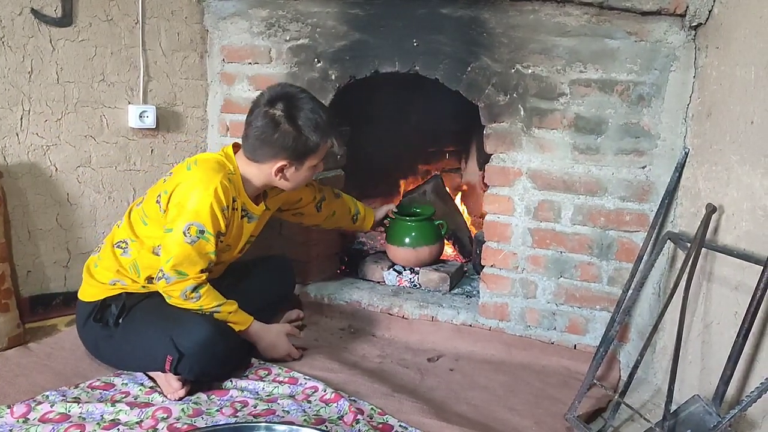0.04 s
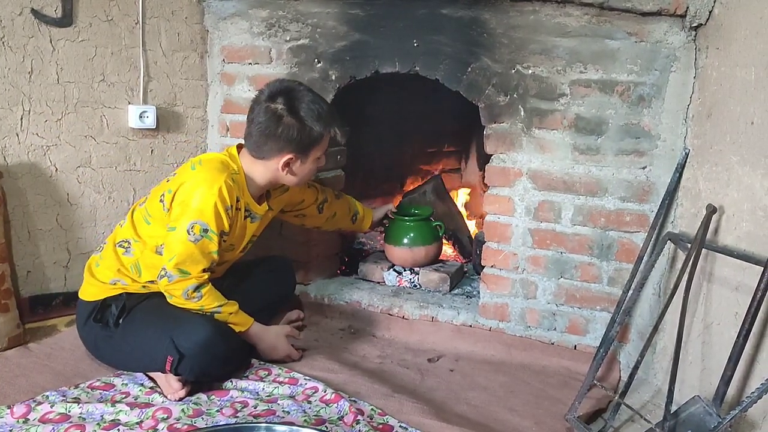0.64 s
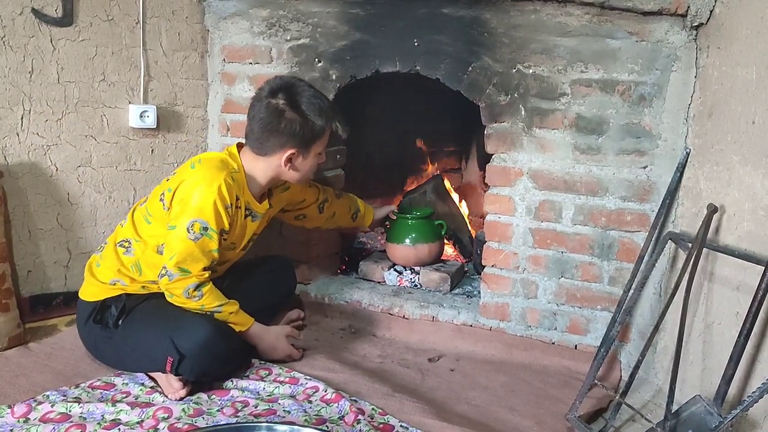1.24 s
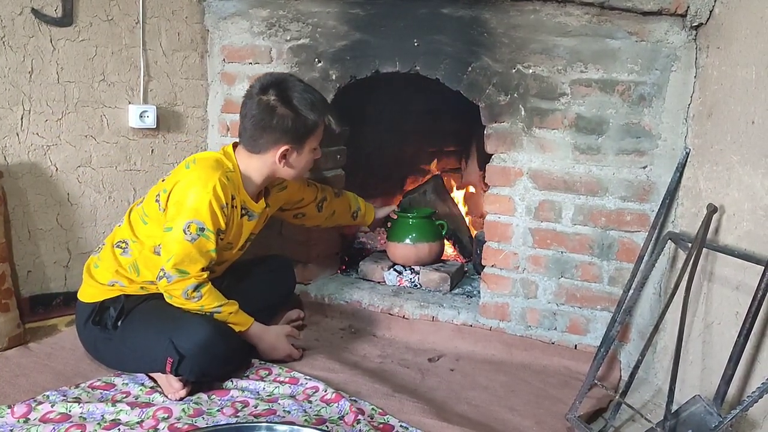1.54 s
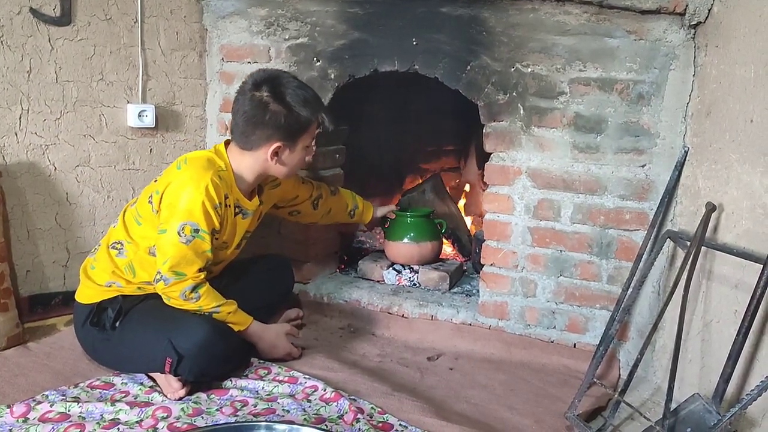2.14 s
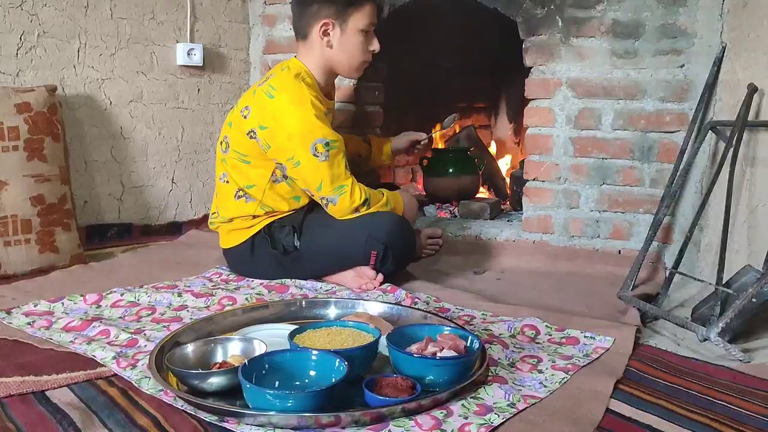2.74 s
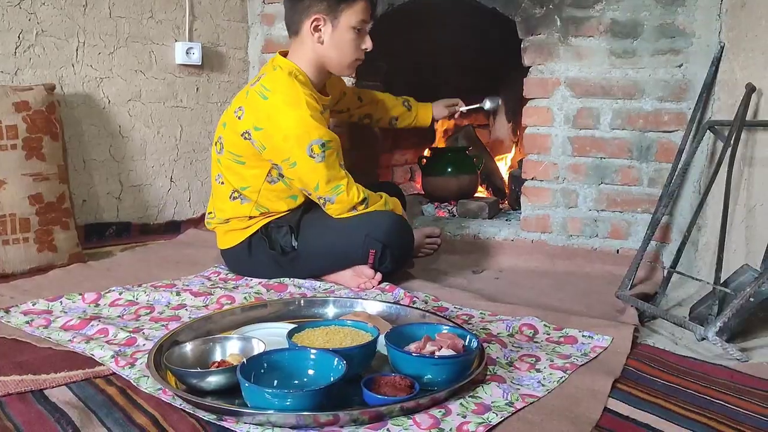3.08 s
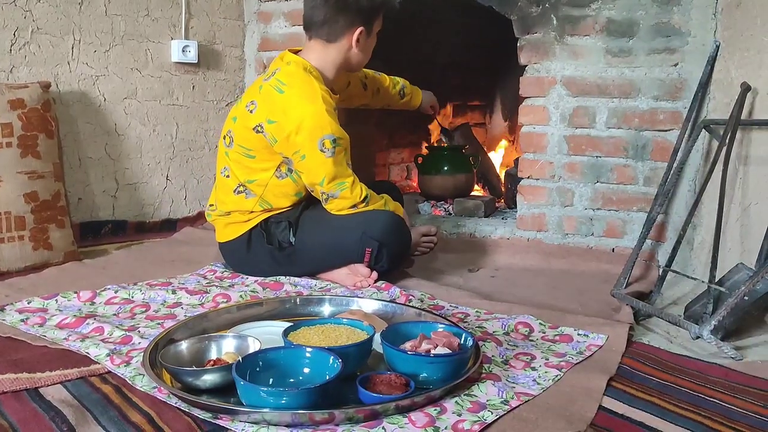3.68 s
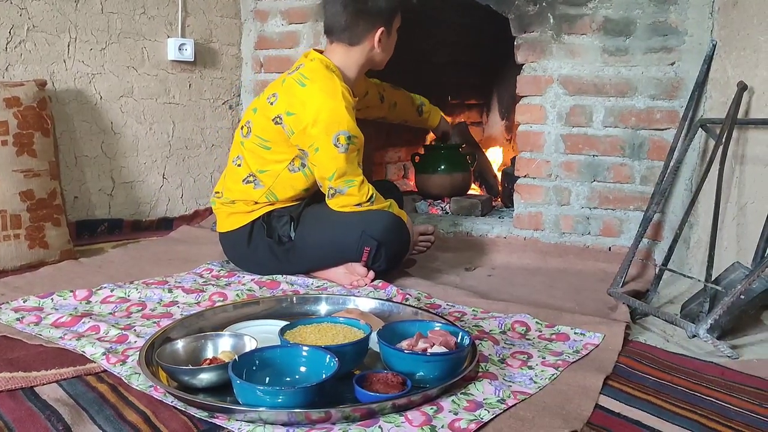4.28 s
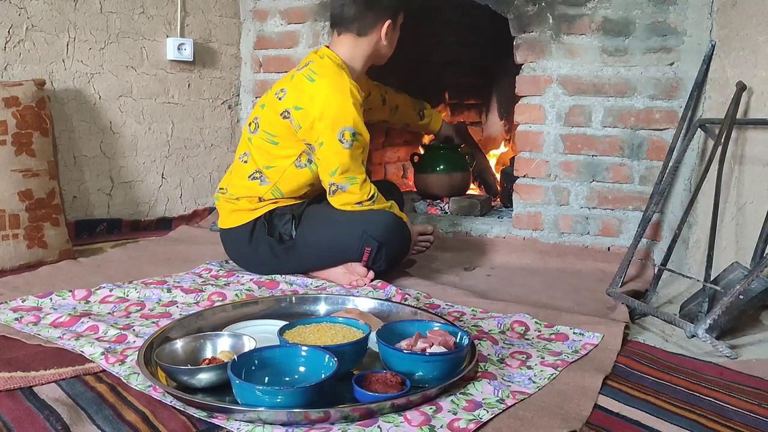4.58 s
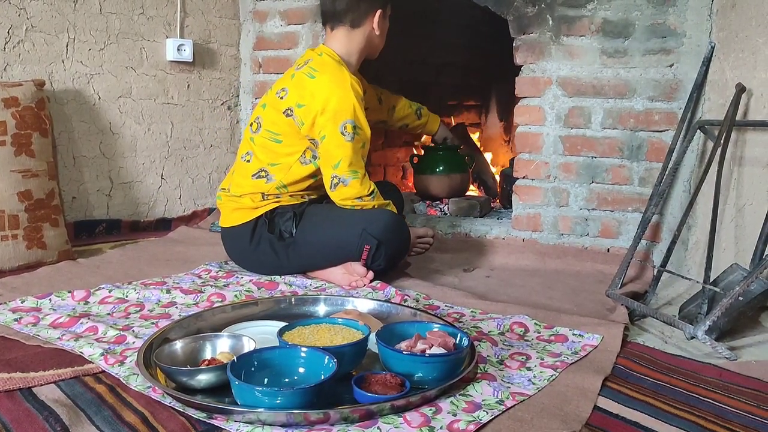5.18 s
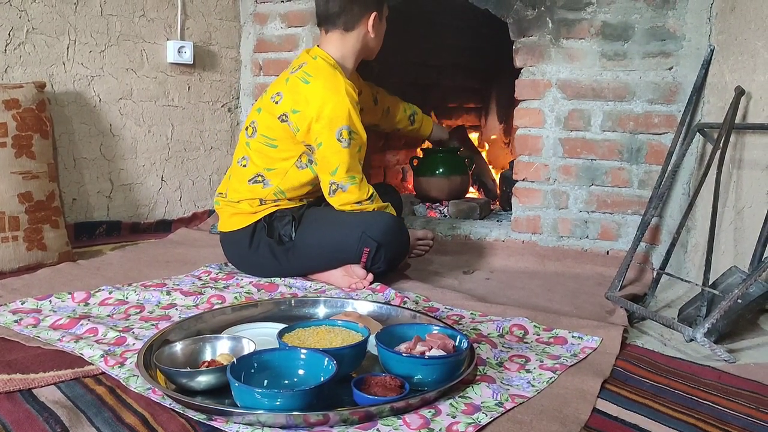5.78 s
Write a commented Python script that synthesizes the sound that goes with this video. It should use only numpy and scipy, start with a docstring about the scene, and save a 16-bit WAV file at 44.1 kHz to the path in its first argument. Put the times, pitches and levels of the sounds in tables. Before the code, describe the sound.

A clay pot softly scrapes and bumps on bricks by a ticking wood fire, with loud electrical pops midway and later spoon clinks.

```python
"""In a small, quiet room, a glazed clay pot stands on bricks at a wood fire. A hand shifts the pot: it scrapes
lightly, and each bump makes the air inside ring hollow. Embers tick and pockets of gas snap in the logs, while
faint chirps and whistles come from far off. Midway, the right channel pops: its level jumps, sticks, crackles
and drains away. Later a steel spoon clinks and knocks on the pot, and both clay and steel ring."""
import sys
import numpy as np
from scipy import signal
from scipy.fft import rfft, irfft
from scipy.io import wavfile

SR = 44100
rng = np.random.default_rng(int(sys.argv[2]) if len(sys.argv) > 2 else 0)


def persist_wave(psi):
    """Save psi, clipped to +-1, as 16-bit WAV."""
    counts = np.round(np.clip(psi, -1, 1) * 32767).astype(np.int16)
    wavfile.write(sys.argv[1], SR, np.atleast_2d(counts).T)


N = 265482

# The room's echo. Each row: pitch in Hz, t60 (the seconds it takes to fade by 60 dB).
ECHO_T60 = [(200, 0.092), (1300, 0.33), (4000, 0.22), (7000, 0.2), (14000, 0.094)]
# How the left side hears a hearth that lies to the right. Each row: pitch in Hz, gain in dB.
LEFT_SHADE = [(300, -1), (1400, 0.5), (3200, -7), (4500, -3.5), (7000, -14), (14000, -3)]
# The air before and after the pops, and a thin hiss on top. Each row: pitch in Hz, relative level in dB.
EARLY_AIR = [(12, -39), (20, 10.5), (43, -3.5), (64, -7), (127, -12.5), (232, -20.5), (267, -25.5),
             (371, -19.5), (517, -34), (561, -29.5), (1150, -28.5), (1390, -32), (2550, -32), (4950, -40.5),
             (14500, -55.5)]
LATE_AIR = [(12, -59), (20, 7.5), (48, -5), (65, -13), (86, -12.5), (172, -15.5), (252, -27), (403, -32),
            (681, -33), (739, -31), (872, -38), (1510, -35), (1840, -36.5), (4310, -39.5), (14500, -60.5)]
AIR_HISS = [(4000, 0), (7300, 1.5), (8800, -2), (10500, 3), (13500, 10.5)]
# How alike the air sounds left and right. Each row: pitch in Hz, likeness from 0 to 1.
AIR_LIKENESS = [(60, 0.64), (180, 0.86), (550, 0.36), (1650, 0.03), (4970, 0.033), (15000, 0.01)]
# Far-off whistles. Each row: start in seconds, length in seconds, first pitch in Hz, level in dB.
WHISTLES = [(0.228, .46, 1053, -68), (2.383, 0.35, 1135, -68.5)]
# Snapping logs. Each row: start in seconds, level in dB, pitch in Hz, relative level of the crack in dB.
SNAPS = [(.487, -58.5, 7000, 2.5), (.7487, -45, 6870, -8), (1.9215, -55, 7440, 5.5), (2.314, -58, 870, -8),
         (2.539, -55, 2650, 5.5)]
# The tone of cracking wood and of rough clay. Each row: pitch in Hz, relative level in dB.
WOOD_COLOUR = [(500, 3.5), (2500, -1.5), (7000, 0.5), (8800, -10), (10500, 1), (13500, -0.5), (16000, -21)]
SCRAPE_COLOUR = [(300, 6), (800, 8.5), (1400, -17), (2000, -1), (2600, 11), (4500, 6.5), (6800, 13),
                 (8800, -1.5), (14000, -4.5)]
# Scrapes of the pot. Each row: start in seconds, length in seconds, level in dB,
# relative level of the fine grit in dB, pitch in Hz around which the clay rings.
SCRAPES = [(0.112, 0.58, -69.5, 3, 2570), (1.131, 0.086, -72, -12, 6600), (1.721, 0.25, -69, -11, 2480),
           (5.901, 0.28, -60.5, -14, 4270)]
# Bumps of the pot. Each row: start in seconds, level in dB, relative levels of grit and thud in dB.
BUMPS = [(0.2902, -44.5, -35, -29), (.385, -51, -16, 0), (1.1115, -43, -35, -41), (1.8114, -54, -14, -10),
         (1.865, -53.5, -21, 9.5), (1.9777, -35.5, -21.5, -16)]
# The tones of the air in the pot, the clay wall and the steel spoon.
# Each row: pitch in Hz, relative level in dB, t60 in seconds.
HOLLOW_TONES = [(320, 3, 0.26), (342, -6, 0.2), (379.4, -14, 0.35), (602, -33, 0.54), (742, -6.5, 0.04),
                (1018, -24, 0.17)]
CLAY_TONES = [(780, -14, .09), (1225, -11, .08), (1330, -1, .1), (1385, -12, .08), (2030, -3, .1),
              (2110, -4, .12), (2243, -7, .17), (2470, -11, .12), (3122, 1, .13), (3272, 2, .15),
              (3385, -5, .11), (3543, 0, .14), (4090, -10, .08), (4242, -1, .1), (4470, -5, .13),
              (4660, -3, .12), (6185, -8, .1), (7205, -3, .11), (5220, -15, .08), (5900, -14, .09),
              (9500, -27, .08), (10700, -25, .08), (13950, -26, .07)]
SPOON_TONES = [(1481, -6, .54), (1675, -19, .42), (2590, -13, .11), (3537, -11, .2), (4288, -1, .1),
               (4525, -6, .1), (4870, -5, .09), (5642, -12, .11), (6540, 1, .1), (6575, -3, .1),
               (6918, -9, .12), (7938, -15, .1), (10650, -14, .06), (12180, -18, .08), (13040, -15, .07),
               (13950, -14, .06)]
# Spoon blows. Each row: start in seconds, level in dB, height from belly (0) to rim (1),
# relative level of the spoon's ring in dB, seconds until it bounces.
CLINKS = [(4.187, -49.5, 1, 11.5, .0035), (4.9951, -39, 0.85, -23.5, 0.0092),
          (5.2426, -42, 0.38, -28, 0.0023), (5.3406, -50, .02, -22, 0.00286)]
# The crack of steel on clay, and the tones a blow wakes at the belly and at the rim.
# Each row: pitch in Hz, relative level in dB.
CONTACT_COLOUR = [(250, -18), (550, -20), (800, -11), (1000, -9), (1320, 2), (1700, -9), (2100, -2),
                  (2750, -13), (3300, 0), (3850, -6), (4400, -2), (5400, -10), (7200, -7), (8400, -22),
                  (14000, -22)]
BELLY_BLOW = [(750, 13.5), (1330, 12), (2100, 5), (3200, -4.5), (3600, 3), (4400, -1.5), (5200, 0),
              (7000, -7), (8600, -6)]
RIM_BLOW = [(750, -9), (1400, -24), (2100, -4), (3200, -2), (3600, -2.5), (4400, 3), (5100, -4), (6800, 6),
            (8600, 0.5)]
# Pops in the right channel. Each row: start in seconds, level jump (1 is full scale), rise time in seconds.
POPS = [(2.6102, .075, .0007), (2.611, -.19, .0012), (2.61202, .115, .00005), (2.618, .075, .0006),
        (2.6185, -.64, .0032)]
# Crackles after them. Each row: start in seconds, level jump (1 is full scale), drain time in seconds.
CRACKLES = [(2.63288, .1, .012), (2.69148, .075, .015)]

POPS_BAND_HZ, FINAL_BAND_HZ, MIC_BAND_HZ = 14500, 16500, 14500  # treble above these is cut


def amp(db):
    """Turns decibels into a gain to multiply by."""
    return 10 ** (np.asarray(db) / 20)


def unit(x):
    """Scales a signal to an average strength (rms) of 1."""
    return x / np.sqrt(np.mean(x ** 2) + 1e-20)


def read(points, hz):
    """Looks up a pitch in a table, blending between rows on a log scale."""
    f, value = np.transpose(points)
    return np.interp(np.log(hz + 1), np.log(f + 1), value)


def add(mix, s, sound):
    """Mixes in a stereo sound, starting at s seconds."""
    start = round(s * SR)
    sound = sound[:, max(-start, 0):]
    part = mix[:, max(start, 0):][:, :sound.shape[1]]
    part += sound[:, :part.shape[1]]


def noise(size, gain, same=0):
    """Stereo noise shaped by gain(Hz); same=1 makes left and right alike."""
    left, other = rfft(rng.standard_normal((2, size)))
    same = np.clip(same, -1, 1)
    right = same * left + np.sqrt(1 - same ** 2) * other
    return unit(irfft(np.array([left, right]) * gain(np.fft.rfftfreq(size, 1 / SR)), size))


def peak(f, hz, width):
    """A hill-shaped gain that favours pitches near hz."""
    return 1 / (1 + (2 * (f - hz) / width) ** 2)


def low_pass(x, hz):
    """Cuts the treble above hz steeply."""
    return signal.oaconvolve(x, signal.firwin(401, hz, window=("kaiser", 8), fs=SR)[None], "same")


def ring(tones, t, weight_db=lambda hz: 0, apart_hz=3500, blur=1.0, blur_hz=70):
    """Fading tones; high ones scatter among the bricks, so they waver and reach the ears out of step."""
    hz, db, t60 = np.transpose(tones)[:, :, None]
    scatter = np.minimum((hz / apart_hz) ** 1.25, 1)
    phase = rng.uniform(-1.48, 1, (2, len(tones), 1)) * scatter * np.pi / 2
    waver = np.stack([noise(len(t), lambda f: peak(f, 0, 2 * blur_hz)) for _ in tones], 1)
    angle = 2 * np.pi * hz * t + phase
    scattered = waver * np.cos(angle) + waver[::-1] * np.sin(angle)
    tone = np.sin(angle) + blur * np.sqrt(scatter) * scattered
    fade = amp(db + weight_db(hz) - 60 * t / t60)
    return (fade * tone / np.sqrt(1 + 2 * blur ** 2 * scatter)).sum(1)


def air(early_db=-55, late_db=-54, change_s=2.612, flutter_db=2.26, flutter_hz=300):
    """Flames and draught flutter low under a smooth hiss; the tone changes at the pops."""
    hz = np.fft.rfftfreq(N, 1 / SR)
    likeness = read(AIR_LIKENESS, hz)
    early = amp(early_db) * noise(N, lambda f: amp(read(EARLY_AIR, f) + read(AIR_HISS, f)), likeness)
    late = amp(late_db) * noise(N, lambda f: amp(read(LATE_AIR, f) + read(AIR_HISS, f)), likeness)
    steady = np.where(np.arange(N) / SR < change_s, early, late)
    bass = irfft(rfft(steady) * peak(hz, 0, 2 * flutter_hz), N)
    flutter = amp(flutter_db * noise(N, lambda f: peak(f, 0, 31))[0])
    return steady + bass * (flutter - 1)


def room_echo(x, onset_s=0.0094, echoes_per_s=4000):
    """Sound bounces around the brick niche and the room; the middle tones linger longest."""
    echoes = rng.choice([-1., 1.], (2, SR // 2)) * (rng.random((2, SR // 2)) < echoes_per_s / SR)
    hz, t, spectrum = signal.stft(echoes, SR, nperseg=256)
    fade = amp(-60 * t / read(ECHO_T60, hz)[:, None])
    tail = signal.istft(spectrum * fade, SR, nperseg=256)[1]
    tail *= 1 - np.exp(-np.arange(tail.shape[1]) / SR / onset_s)
    return signal.fftconvolve(x, tail / np.linalg.norm(tail[0]), axes=1)[:, :N]


def whistles(width_hz=130, fall=.085, chirp_every_s=1.012, chirp_s=0.117, chirp_hz=1527, chirp_db=-67):
    """Three far-off chirps and two longer whistles: narrow bands of noise that swell and sink in pitch."""
    out, t = np.zeros((2, N)), np.arange(SR * 2 // 3) / SR
    chirps = [(.03 + k * chirp_every_s, chirp_s, chirp_hz, chirp_db) for k in range(3)]
    for s, length, first_hz, db in chirps + WHISTLES:
        progress = np.minimum(t / length, 1)
        angle = 2 * np.pi * np.cumsum(first_hz * (1 - fall * progress)) / SR
        band = sum(noise(len(t), lambda f: peak(f, 0, width_hz), same=0.11) * wave
                   for wave in (np.cos(angle), np.sin(angle)))
        add(out, s, amp(db) * np.sin(np.pi * progress) * unit(band))
    return out


def embers(per_s=14, db=-76, spread_db=3, t60=0.041):
    """The glowing wood gives tiny ticks at random moments."""
    t = np.arange(SR // 100) / SR
    moments = rng.random(N) < per_s / SR
    ticks = moments * amp(db + spread_db * np.minimum(rng.exponential(1, N), 3))
    tick = noise(len(t), lambda f: amp(read(WOOD_COLOUR, f))) * amp(-60 * t / t60)
    return signal.oaconvolve(ticks[None], tick, axes=1)[:, :N]


def log_snaps(t60=0.031, rise_s=0.00016, split_s=0.025, split_db=-6):
    """A pocket of gas bursts in a log; then the wood splits further with a weaker crack."""
    out, t = np.zeros((2, N)), np.arange(SR // 16) / SR
    for s, db, hz, crack_db in SNAPS:
        for delay, drop_db in ((0, 0), (split_s, split_db)):
            pitched = noise(len(t), lambda f: peak(f, hz, 0.24 * hz), same=1)
            crack = amp(crack_db) * noise(len(t), lambda f: amp(read(WOOD_COLOUR, f)), same=0.063)
            loudness = amp(db + drop_db - 60 * t / t60) * (1 - np.exp(-t / rise_s))
            add(out, s + delay, (pitched + crack) * loudness)
    return out


def pot_scrapes(grain_db=3, ring_width_hz=30, grip_s=0.036, fine_fade_db_per_s=63):
    """Rough clay grips, then eases off; fine grit is crushed first, and wall and spoon tones sing along."""
    out, size = np.zeros((2, N)), SR * 2 // 3
    t = np.arange(size) / SR

    def resonances(f):
        return sum(amp(db / 2) * peak(f, hz, ring_width_hz) for hz, db, _ in CLAY_TONES + SPOON_TONES)

    for s, length, db, fine_db, ring_hz in SCRAPES:
        rough = noise(size, lambda f: amp(read(SCRAPE_COLOUR, f)), same=0.2)
        fine = noise(size, lambda f: peak(f, 11500, 4000)) * amp(fine_db - fine_fade_db_per_s * t)
        tones = noise(size, lambda f: peak(f, ring_hz, 0.58 * ring_hz) * resonances(f))
        tones *= amp(0.49 * (db + 73.5))  # harder strokes ring more
        grain = amp(grain_db * noise(size, lambda f: peak(f, 0, 320))[0])
        stroke = np.interp(t, [0, grip_s, length], [0, 1, 0]) ** 1.13
        add(out, s, amp(db) * stroke * grain * (rough + fine + tones))
    return out


def pot_bumps(swell_s=0.0045, grit_t60=0.2, grit_hz=900, wall_db=-31, thud_hz=200, thud_t60=0.074):
    """The pot bumps on the bricks with a thud and a crunch; its air rings, and faintly its wall."""
    out, t = np.zeros((2, N)), np.arange(SR // 2) / SR
    swell = 1 - np.exp(-t / swell_s)
    for s, db, grit_db, thud_db in BUMPS:
        grit = noise(len(t), lambda f: f / (f + 200) / (1 + (f / grit_hz) ** 2), same=0.3)
        grit *= amp(grit_db - 60 * t / grit_t60)
        thud = noise(len(t), lambda f: peak(f, thud_hz, thud_hz) ** 2, same=0.83)
        thud *= amp(thud_db - 60 * t / thud_t60)
        hollow = ring(HOLLOW_TONES, t, blur=.7, blur_hz=60)
        wall = ring(CLAY_TONES, t[:SR // 5], lambda f: -f / 700)  # a soft blow wakes little treble
        add(out, s, amp(db) * ((hollow + thud) * swell + grit))
        add(out, s, amp(db + wall_db) * wall)
    return out


def spoon_clinks(rise_s=0.00031, crack_db=6, crack_t60=0.024, bounce_db=-2, hollow_db=-22):
    """The spoon hits the pot and bounces once; where it lands decides which clay tones ring."""
    cracks, ringing, t = np.zeros((2, N)), np.zeros((2, N)), np.arange(SR * 2 // 3) / SR
    hz = np.fft.rfftfreq(len(t), 1 / SR)
    for s, db, height, spoon_db, bounce_s in CLINKS:
        def place_db(f):
            return (1 - height) * read(BELLY_BLOW, f) + height * read(RIM_BLOW, f)

        blow = amp(db) * (1 - np.exp(-t / rise_s))
        for delay, drop_db in ((0, 0), (bounce_s, bounce_db)):
            contact = noise(len(t), lambda f: amp(read(CONTACT_COLOUR, f)), same=0.9)
            crack = irfft(rfft(contact) * amp(place_db(hz)), len(t))
            add(cracks, s + delay, blow * crack * amp(crack_db + drop_db - 60 * t / crack_t60))
        wall = ring(CLAY_TONES, t, place_db, blur=.6, blur_hz=55)
        steel = ring(SPOON_TONES, t, apart_hz=6000, blur=.35, blur_hz=40)
        hollow = amp(hollow_db) * ring(HOLLOW_TONES, t)
        add(ringing, s, blow * (wall + amp(spoon_db) * (steel + hollow)))
    return cracks, ringing


def right_pops(limit=.365, drain_s=.215, fizz_db=-44, fizz_t60=0.0098):
    """The right channel's level slams to its limit, sticks there, crackles, and drains away."""
    t, swing, steps = np.arange(N) / SR, np.zeros(N), np.zeros(N)
    for s, jump, rise_s in POPS:
        rise = np.sin(np.pi / 2 * np.clip((t - s) / rise_s, 0, 1)) ** 2
        swing += jump * rise * np.exp(-np.maximum(t - s, 0) / drain_s)
    for s, jump, fade_s in CRACKLES:
        steps += jump * (t >= s) * np.exp(-np.maximum(t - s, 0) / fade_s)
    since = t - CRACKLES[0][0]  # the fizz starts with the first crackle
    fizz = rng.standard_normal(N) * (since >= 0) * amp(fizz_db - 60 * np.maximum(since, 0) / fizz_t60)
    right = np.maximum(swing, -limit) + low_pass((steps + fizz)[None], POPS_BAND_HZ)[0]
    return np.array([np.zeros(N), right])


def scene():
    """Mixes pot, fire, whistles and echo, duller on the left, over the room's air."""
    cracks, ringing = spoon_clinks()
    fire = log_snaps() + embers()
    echo = room_echo(amp(-4.5) * cracks + amp(-16.5) * ringing + amp(-7.5) * fire)
    left, right = cracks + ringing + fire + pot_bumps() + pot_scrapes() + whistles() + echo
    left = irfft(rfft(left) * amp(read(LEFT_SHADE, np.fft.rfftfreq(N, 1 / SR))), N)
    return np.array([left, right]) + air() * amp([[-.4], [.4]])


def record(dry):
    """The microphone loses the highest treble, the pops join in, and the treble is cut once more."""
    return low_pass(low_pass(dry, MIC_BAND_HZ) + right_pops(), FINAL_BAND_HZ)


dry = scene()
out = record(dry)
persist_wave(out)
```